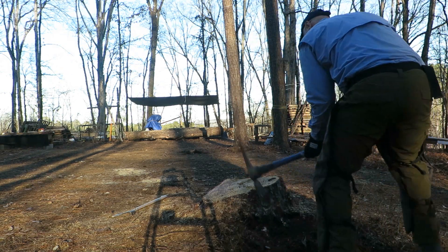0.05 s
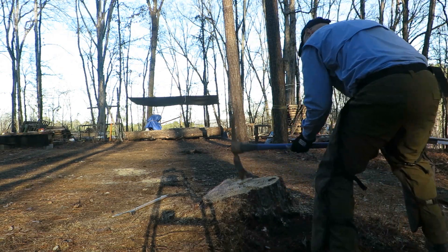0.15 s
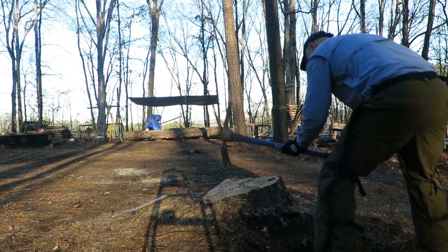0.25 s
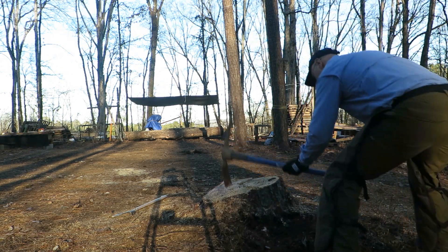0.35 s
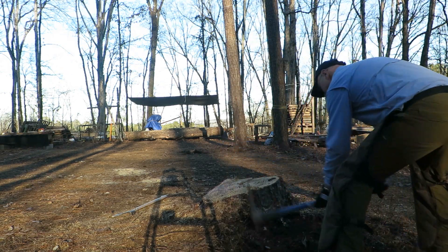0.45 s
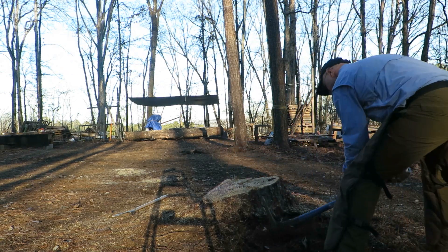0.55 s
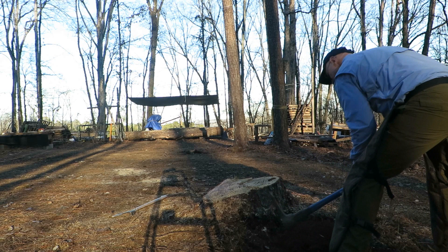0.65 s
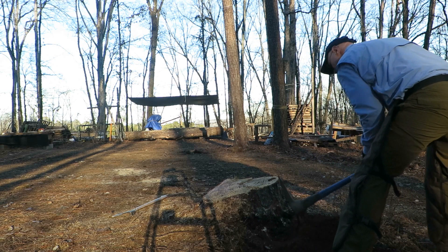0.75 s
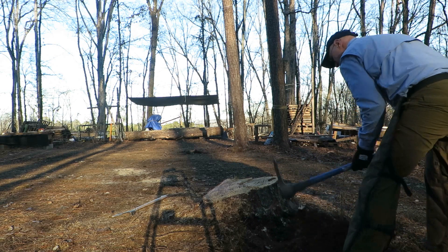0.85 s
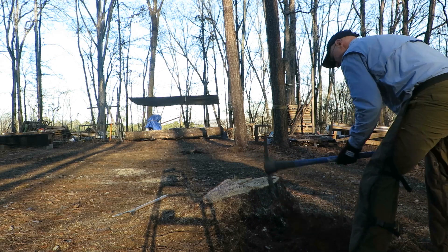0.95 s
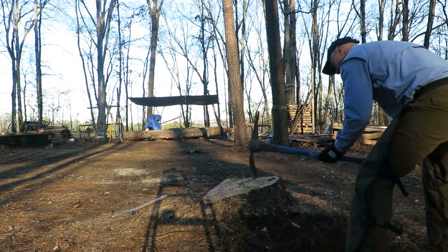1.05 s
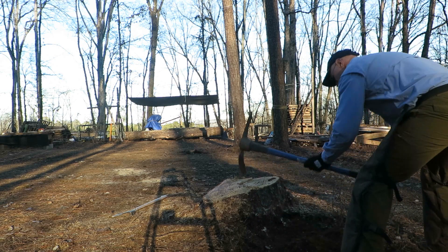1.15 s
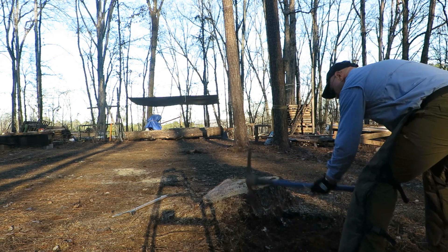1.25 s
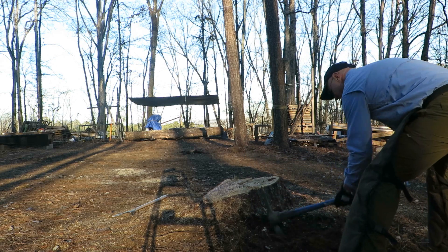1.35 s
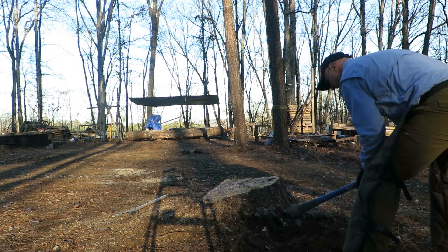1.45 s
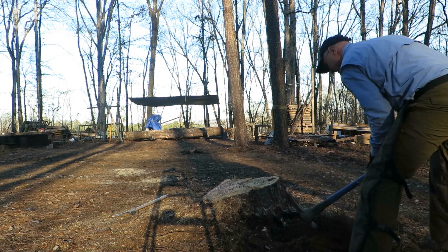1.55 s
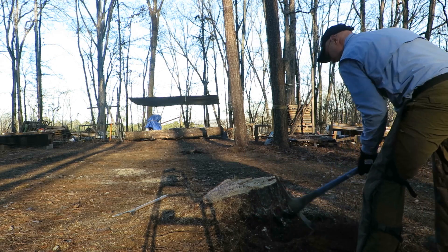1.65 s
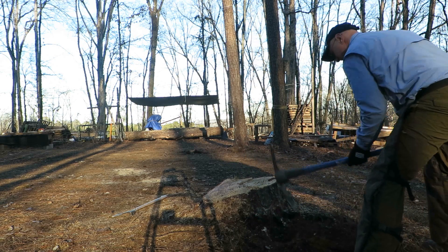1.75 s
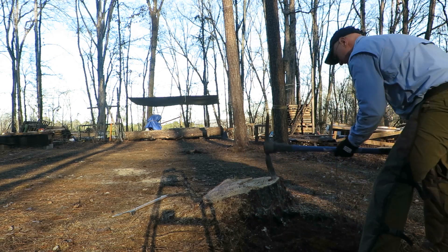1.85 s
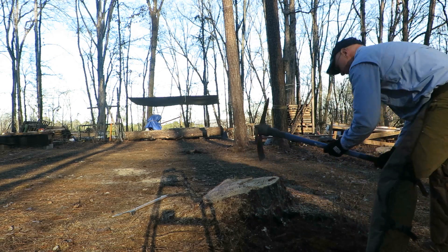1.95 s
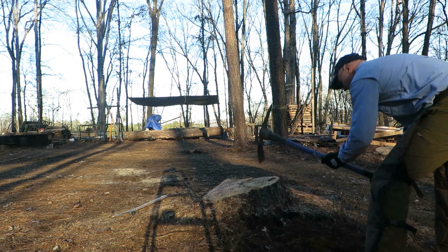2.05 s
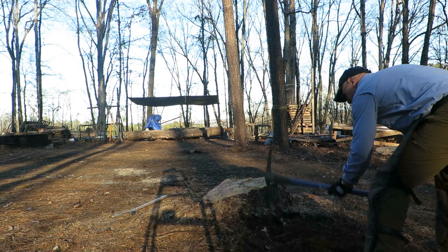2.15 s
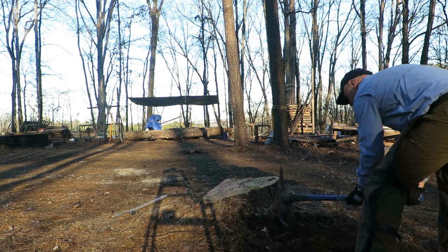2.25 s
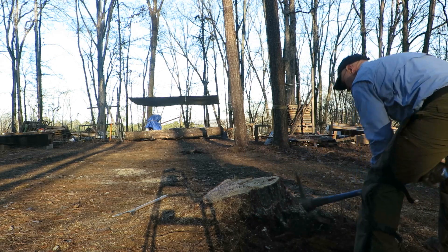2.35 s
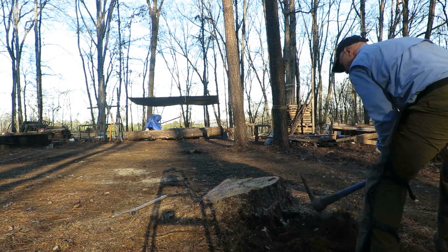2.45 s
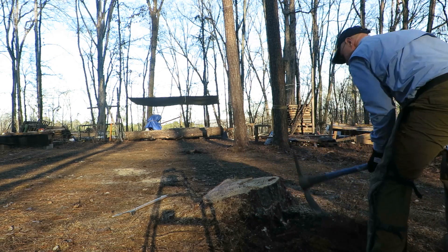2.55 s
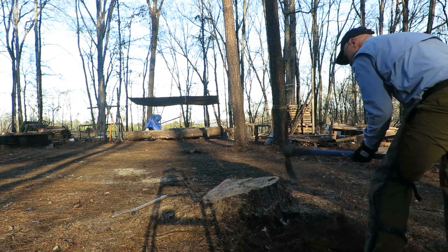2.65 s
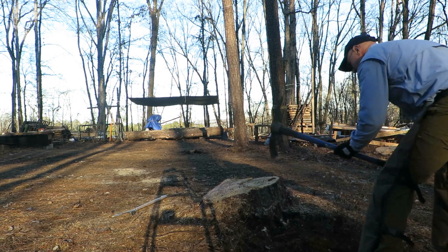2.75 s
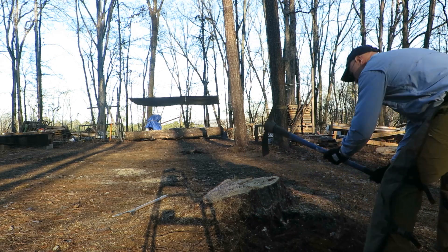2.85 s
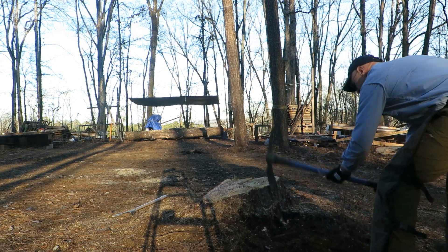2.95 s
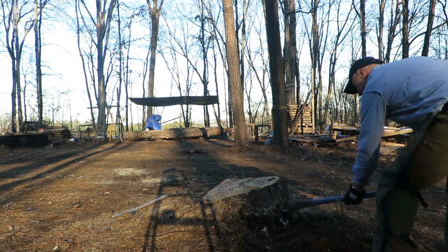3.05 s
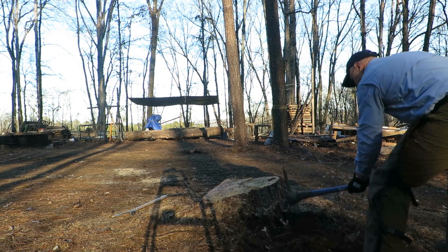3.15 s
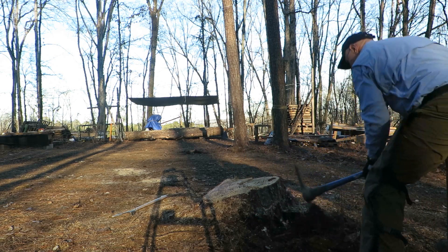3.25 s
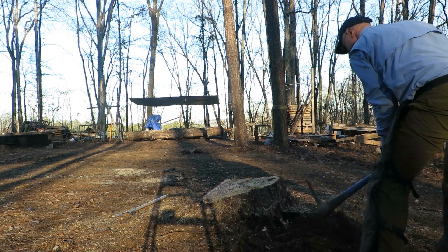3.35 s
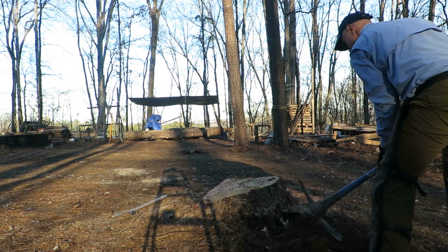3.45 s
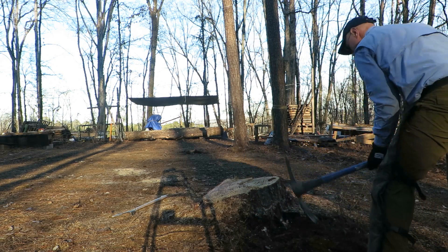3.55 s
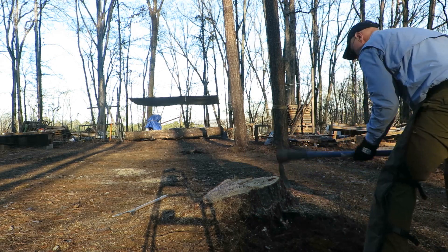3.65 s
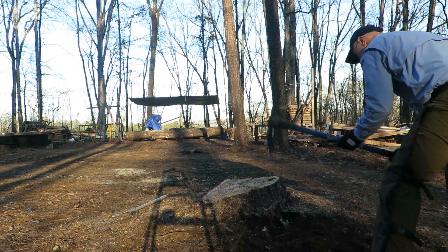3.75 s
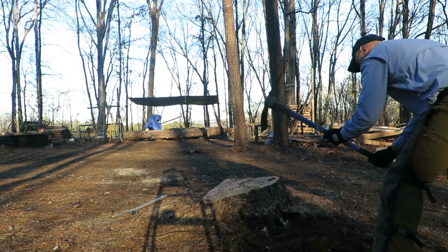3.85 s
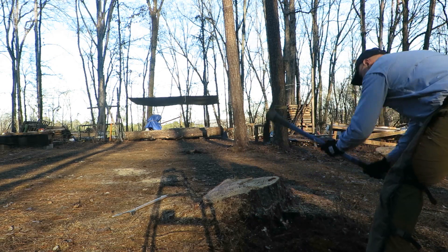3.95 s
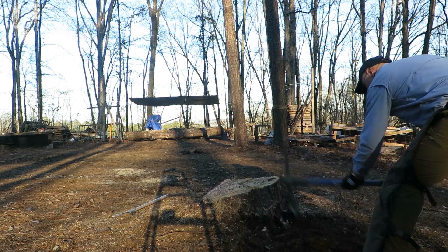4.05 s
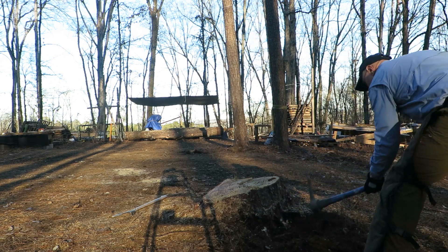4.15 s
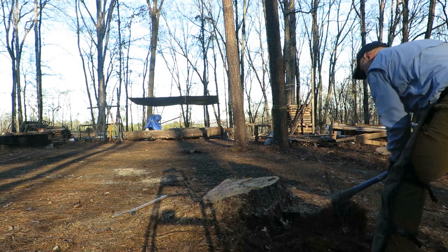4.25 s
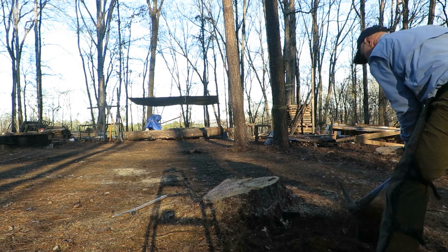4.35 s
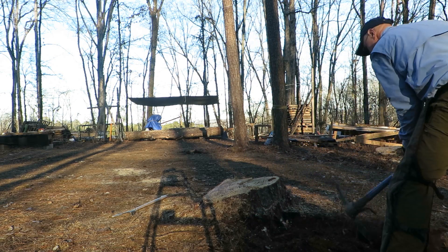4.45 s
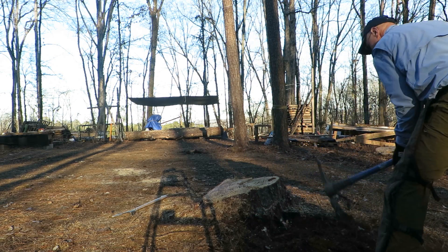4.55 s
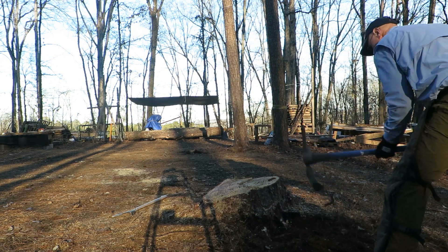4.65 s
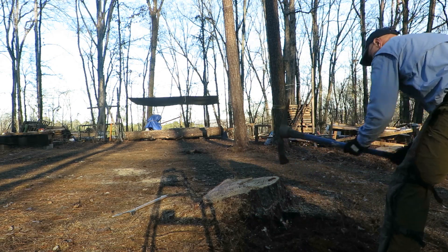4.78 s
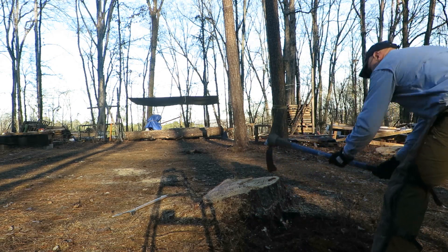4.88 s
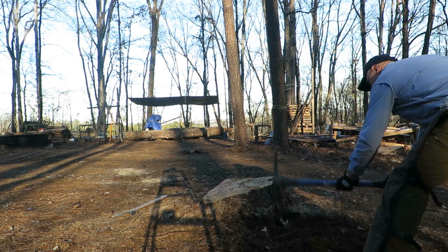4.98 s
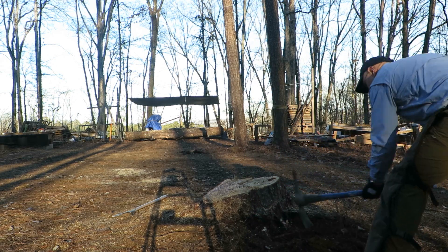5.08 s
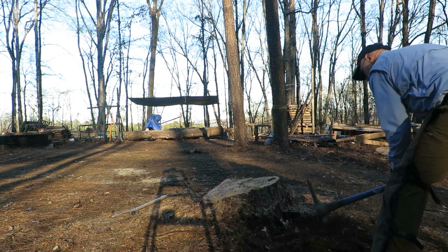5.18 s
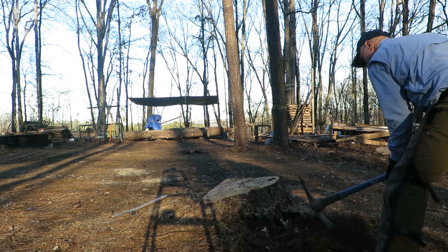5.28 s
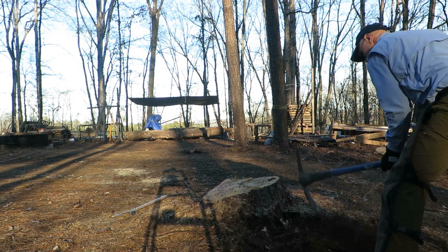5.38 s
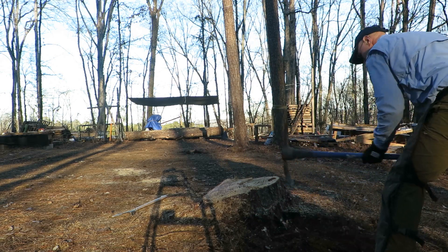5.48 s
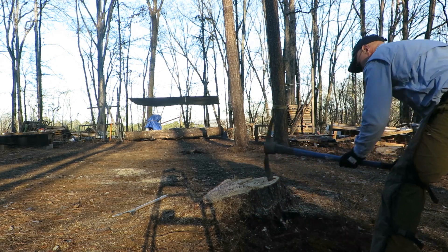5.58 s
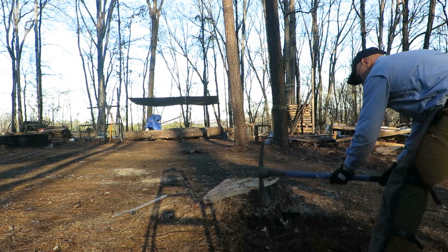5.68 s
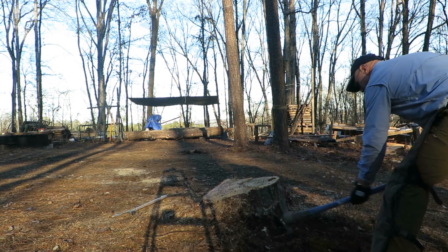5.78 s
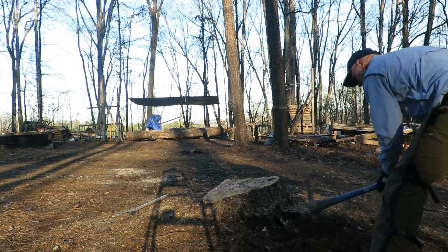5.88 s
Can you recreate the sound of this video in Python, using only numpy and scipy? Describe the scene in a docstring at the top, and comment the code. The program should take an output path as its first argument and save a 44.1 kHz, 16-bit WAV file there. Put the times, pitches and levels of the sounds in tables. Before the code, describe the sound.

Outdoors and close up, a pickax works dry soil and roots, with almost no echo. A brisk rustle of cloth and leaves and a soft wind flutter open the stretch. At 0.65 s the first blow clanks, with a knock, short steel ring and grit. At 1.53 s a duller, coarser chop brings the heaviest low thud. At 2.37 s a crisp gritty crunch thuds, followed by small steel scrapes near 2.5 s. At 3.24 s the head rings brightly; rustling and strong low wind puffs follow until 3.7 s. At 4.28 s comes a short, hard crack. At 5.22 s a knock and thud lead into a rattling run of steel clinks and scraping until about 5.4 s. Crumbs tick throughout and far traffic drones faintly; wind buffets again near 5.65 s. The small stereo microphone's limiter dips the sound after loud blows.

```python
"""Outdoors, a pickax bites into dry soil and roots: grit crunches, the steel head rings briefly, the ground thuds.
Crushing is noise in bursts that rise fast and die exponentially; steel, roots and stones are damped modes.
Clothes and leaf litter rustle as grainy noise, crumbs tick as short noise bursts, far traffic drones as low noise.
Light wind puffs as low noise and swelling tones on a small stereo microphone, whose limiter ducks at the blows."""
import sys
import numpy as np
from scipy import signal
from scipy.fft import rfft, irfft, next_fast_len
from scipy.io import wavfile
from scipy.ndimage import minimum_filter1d, map_coordinates

SR = 44100
rng = np.random.default_rng(int(sys.argv[2]) if len(sys.argv) > 2 else 0)


def int16_out(signal):
    """Quantize to a 16-bit WAV file."""
    q = np.round(np.clip(np.atleast_2d(signal).T, -1, 1) * 32767)
    wavfile.write(sys.argv[1], SR, q.astype(np.int16))


N = 260977

# Modes of the steel head, damped by soil. Each row: frequency in hertz, bandwidth in hertz,
# level in dB under steady shaking.
STEEL_MODES = [(1615, 130, -7), (1875, 150, -6), (2340, 85, 1), (2950, 150, -5), (3980, 60, 2),
               (5400, 120, -4), (5850, 130, -5), (6450, 130, -2), (6960, 80, -1), (8720, 150, -6),
               (9260, 200, -2), (11550, 150, -9)]
# Spectral density of rustling cloth and leaves. Each row: frequency in hertz, relative density in dB per hertz.
CLOTH_SPECTRUM = [(710, -5.5), (1200, -9), (1340, -9.5), (1790, -1), (2180, -4), (3550, -0.5), (3830, 1),
                  (4170, -1), (11900, -2.5), (14500, -12.5), (16000, -29)]
# How the microphone pair hears surrounding sound. Each row: frequency in hertz, likeness of the channels (0-1),
# lead of the left in radians, left minus right in dB.
AROUND_PAIR = [(59, 1, 0.5, -0.46), (200, 0.92, 0, -0.9), (726, 0.51, 0, -1.2), (1380, 0.5, -1, -1.5),
               (2900, 0.78, 1.07, -1), (5830, 0.39, -1.5, -0.67), (8250, 0.23, -1.5, -2),
               (12900, 0.48, -4.5, -1.5)]


def amp(db):
    """Decibels to an amplitude ratio, by the logarithmic law of level."""
    return 10 ** (np.asarray(db) / 20)


def unit(x):
    """Normalization to unit root-mean-square amplitude."""
    return x / np.sqrt(np.mean(x ** 2) + 1e-20)


def along(points, hz):
    """Interpolation of (Hz, value, ..) columns on a logarithmic frequency axis."""
    f, *columns = np.transpose(points)
    return [np.interp(np.log(hz + 1), np.log(f + 1), column) for column in columns]


def curves(rows):
    """Linear interpolation in time: one value per sample for each column after the seconds."""
    s, *columns = np.transpose(rows)
    return [np.interp(np.arange(N) / SR, s, column) for column in columns]


def wobble(rate):
    """Band-limited random modulation: a smooth curve through random knots, rate of them a second."""
    knots = rng.standard_normal(int(N * rate / SR) + 4)
    return map_coordinates(knots, [np.arange(N) * rate / SR])


def filtered(x, response):
    """Linear filtering: the spectrum of x times a complex response of frequency."""
    m = next_fast_len(N + SR // 2)  # zero padding keeps the tail from wrapping round
    return irfft(rfft(x, m) * response(np.fft.rfftfreq(m, 1 / SR)), m)[..., :N]


def noise(spectrum, grain_db, grain_rate):
    """Spectrally shaped noise: two unrelated noises of joint rms 1 that share one grainy flicker."""
    raw = rng.standard_normal((2, N)) * amp(grain_db * wobble(grain_rate))
    return unit(filtered(raw, lambda hz: amp(along(spectrum, hz)[0])))


def ringing(modes):
    """Modal superposition: the response of a set of resonances with alternating sign."""
    def response(f):
        total = 0
        for k, (center, width, db) in enumerate(modes):
            resonance = 1j * f * width / (center * center - f * f + 1j * f * width)
            total = total + (-1) ** k * amp(db) * resonance
        return total
    return response


def heard(pair, ports):
    """Interchannel coherence: mixes a sound and its unrelated twin into left and right; the mean keeps its level."""
    def response(hz):
        alike, lead, lean_db = along(ports, hz)
        turn = np.arccos(np.clip(alike, 0, 1)) / 2
        left = amp(lean_db / 2) * np.exp(.5j * lead)
        shared, unrelated = np.cos(turn), np.sin(turn)
        mean = np.hypot(abs(left + 1 / left) * shared, abs(left - 1 / left) * unrelated) / 2
        return np.array([[left * shared, left * unrelated], [shared / left, -unrelated / left]]) / mean
    return filtered(pair, response).sum(axis=1)


def add(track, s, sound):
    """Superposition: mixes a short sound in at s seconds."""
    part = track[..., round(s * SR):][..., :sound.shape[-1]]
    part += sound[..., :part.shape[-1]]


def traffic():
    """Broadband drone: far traffic as low noise of slowly fluctuating level."""
    # Each row: time in seconds, level in dB about which the drone fluctuates.
    traffic_levels = [(0, -39.5), (1, -39.5), (2, -41.5), (2.7, -46), (3.4, -40), (4.4, -44), (5.92, -40)]
    # Each row: frequency in hertz, relative density in dB per hertz.
    drone_spectrum = [(30, -0.5), (100, 8), (200, -3.5), (350, -4.5), (540, -1.5), (1130, -7),
                      (2500, -27.5), (3250, -23), (5500, -120)]
    level_db = curves(traffic_levels)[0] + 2.6 * wobble(5.27)
    return amp(level_db) * noise(drone_spectrum, 0.2, 34)


def wind():
    """Turbulent pressure: low noise flutters on the microphone, and strong eddies add swelling tones."""
    # Each row: time in seconds, level in dB of the steady flutter.
    wind_levels = [(0.0, -51), (0.05, -36), (0.18, -68), (0.33, -72), (0.77, -42), (0.92, -45), (1.14, -50),
                   (1.43, -43.5), (2.34, -43), (2.67, -47.5), (3.43, -41.5), (3.84, -40.5), (4.48, -44),
                   (4.65, -38), (4.78, -39), (4.91, -40.5), (5.5, -44), (5.92, -39.5)]
    # Each row: frequency in hertz, relative density in dB per hertz.
    buffet_spectrum = [(13, -22), (22, -10), (43, 10.5), (107, -2), (135, 0), (157, -3.5), (300, -23),
                       (390, -13), (660, -120)]
    # Strongest eddies. Each row: time in seconds (the swell starts 4 ms before it), level in dB, pitch in hertz.
    puffs = [(0.099, -22, 105), (0.172, -27, 90), (0.19, -21, 109), (0.44, -33, 119.5), (0.615, -32, 69.4),
             (1.836, -29, 95), (2.2, -24.5, 74), (2.239, -24.5, 91.5), (2.27, -19.5, 88),
             (2.289, -18.5, 101), (3.214, -20.5, 100), (3.279, -25.5, 86), (3.34, -22.5, 76),
             (3.522, -18.5, 59), (3.561, -23, 60), (3.625, -22, 79.5), (3.679, -18, 145), (3.707, -22, 68),
             (4.451, -22.5, 100.5), (4.554, -29, 112), (4.565, -23, 107), (4.609, -25.5, 90),
             (4.719, -20, 124), (4.738, -20, 102), (4.835, -25.5, 113), (4.848, -32, 110),
             (5.631, -22, 143), (5.652, -18, 89), (5.669, -15.5, 135), (5.689, -17.5, 90)]
    out = amp(curves(wind_levels)[0]) * noise(buffet_spectrum, 1.9, 8.5)
    t = np.arange(SR // 12) / SR
    for (s, db, hz), phase in zip(puffs, rng.uniform(0, 2 * np.pi, len(puffs))):
        swell = t * hz / 0.55 * np.exp(1 - t * hz / 0.52)  # fullest after about half a cycle
        cycle = 2 * np.pi * hz * t + phase
        swing = np.sin(cycle) + 0.33 * np.sin(2 * cycle)  # the overtone makes it lopsided
        add(out[0], s - .004, amp(db) * swell * swing)
    return out


def crackle():
    """Poisson process: dry bits of leaf and soil snap at random, each a noise burst of about a millisecond."""
    rate, spread_db, decay_s = 330, 3.5, 0.0013  # snaps per second, size scatter in dB, e-fold time
    sizes = amp(spread_db * np.minimum(rng.exponential(size=N), 3.5))
    snaps = (rng.uniform(size=N) < rate / SR) * sizes
    bursts = signal.lfilter([1], [1, -np.exp(-1 / (decay_s * SR))], snaps)
    return unit(filtered(bursts * rng.standard_normal((2, N)), lambda hz: amp(along(CLOTH_SPECTRUM, hz)[0])))


def rustle():
    """Friction noise: clothes and leaves make dense fine grains, crisper as the movement grows brisker."""
    # Each row: time in seconds, level in dB about which the rustle flickers.
    rustle_levels = [(0, -23.5), (.115, -42.5), (.42, -46), (.494, -34), (.62, -42.5), (.758, -46),
                     (.863, -37), (.93, -39.5), (.993, -34.5), (1.122, -39.5), (1.207, -31.5), (1.36, -45),
                     (1.46, -42.5), (1.69, -40), (1.76, -43.5), (1.94, -41), (2.105, -43), (2.22, -33.5),
                     (2.27, -40.5), (2.32, -33.5), (2.37, -39), (2.579, -43.5), (2.794, -39.5),
                     (2.998, -42), (3.22, -35.5), (3.317, -43), (3.467, -44.5), (3.527, -31), (3.6, -37.5),
                     (3.707, -29.5), (3.826, -45.5), (4.2, -48), (4.36, -46.5), (4.42, -42), (4.505, -47),
                     (4.724, -32), (5.03, -45.5), (5.178, -42), (5.37, -32), (5.5, -38), (5.642, -39),
                     (5.917, -48)]
    crisp_full_db, crisp_range_db = -20, 33  # all crisp at this level, all dull this far below
    crackle_db = -9.5  # re the rustle
    db, = curves(rustle_levels)
    # the spectrum tilts 4 dB per octave about 5 kHz either way
    dull = noise([(hz, v - 4 * np.log2(hz / 5000)) for hz, v in CLOTH_SPECTRUM], 1.4, 900)
    crisp = noise([(hz, v + 4 * np.log2(hz / 5000)) for hz, v in CLOTH_SPECTRUM], 1.0, 1500)
    share = np.clip(1 + (db - crisp_full_db) / crisp_range_db, 0, 1)
    grains = np.sqrt(1 - share) * dull + np.sqrt(share) * crisp
    flicker_db = 1.3 * wobble(30) + 1 * wobble(90)
    return amp(db + flicker_db) * (grains + amp(crackle_db) * crackle())


def scattered(count, db, hz):
    """Random scatter: rows (s, dB, pitch Hz) of small ticks, within 4 dB and 1.3 octaves of the given centre."""
    when, size, pitch = rng.uniform(size=(count, 3)).T
    return list(zip(when * N / SR, db + 8 * (size - .5), hz * 2 ** (2.6 * (pitch - .5))))


def crumbs():
    """Impact noise: each crumb or twig is a short decaying burst of noise in a band around its pitch."""
    # Loudest crumbs and twigs. Each row: start in seconds, level in dB, pitch in hertz.
    ticks = [(.0674, -29.5, 3870), (.562, -29, 5770), (.776, -29.5, 10600), (1.2034, -25, 9670),
             (1.6357, -34.5, 2330), (1.661, -30, 1890), (2.0306, -33, 5200), (2.13, -30, 4450),
             (2.8262, -36, 1760), (3.0528, -28.5, 3840), (3.173, -30, 10000), (3.2024, -32, 6890),
             (3.512, -30, 9360), (4.49, -39, 1790), (4.58, -40, 3500), (4.651, -33, 6720),
             (4.789, -27.5, 1680), (5.0814, -30.5, 9600), (5.092, -30, 11500), (5.1203, -27, 4030),
             (5.163, -37, 10100), (5.4263, -27.5, 8300), (5.4571, -28, 1930), (5.5378, -28, 1670),
             (5.6045, -27.5, 7750), (5.8, -30, 3470)]
    t60 = 0.026  # s
    out, t = np.zeros((2, N)), np.arange(SR // 20) / SR
    for s, db, hz in list(ticks) + scattered(count=14, db=-47, hz=4800):
        band = signal.butter(2, [hz / 1.53, min(hz * 1.3, SR / 2.2)], "bandpass", fs=SR)
        burst = unit(signal.lfilter(*band, rng.standard_normal((2, len(t)))))
        add(out, s, amp(db - 60 * t / t60) * burst)
    return out


def ground():
    """Damped yielding: the ground gives in flattened low swings that die fast, roughened by breaking clods."""
    # Each row: time in seconds (the thud starts half a cycle before it), level in dB, pitch in hertz.
    thuds = [(0.659, -16.5, 251), (0.666, -25, 546), (1.518, -19.5, 76.6), (1.532, -19, 330),
             (1.5361, -3.5, 140), (1.552, -24, 79.5), (2.411, -14, 144), (2.52, -33, 313),
             (2.533, -36, 304), (3.238, -18.5, 150), (3.246, -24, 332), (3.479, -33, 393),
             (3.496, -33, 398), (4.281, -27, 343), (4.284, -22.5, 138), (5.2279, -10.5, 144),
             (5.3344, -18, 420)]
    # Each row: frequency in hertz, relative density in dB per hertz.
    clod_spectrum = [(120, -45), (250, 15.5), (400, 12), (800, 14), (1400, -14)]
    full_build_s, longer_per_db = 0.018, 0.5  # 60 dB build at 0 dB; weak thuds last longer, dB of time per dB
    dies_faster = 1.96  # than it builds
    clods_db = -9  # re the thud's envelope
    out, clods = np.zeros((2, N)), np.zeros(N)
    for s, db, hz in thuds:
        t = np.arange(SR // 5) / SR - .5 / hz
        late = t - 0.575 / hz  # time after the envelope's peak
        build_s = full_build_s * amp(-longer_per_db * db)
        shape = amp(db - 60 * np.maximum(-late, dies_faster * late) / build_s)
        blunt = np.tanh(2 * np.sin(2 * np.pi * hz * t))
        add(out[0], s - .5 / hz, shape * blunt)
        add(clods, s - .5 / hz - .003, amp(clods_db) * shape)  # clods break 3 ms ahead
    return out + clods * noise(clod_spectrum, 2.2, 330)


def clinks():
    """Modal excitation: a stone striking the steel rings the head's modes, those near its favoured mode the most."""
    # Each row: start in seconds, level in dB of the favoured mode, favoured mode in hertz.
    stone_strikes = [(0.659, -11, 1615), (0.6593, -7.5, 2950), (0.661, -11.5, 3980), (1.53, -17, 5400),
                     (1.530, -16, 3980), (1.661, -35, 1875), (2.464, -29, 3980), (2.5188, -15, 1875),
                     (2.525, -19, 2340), (2.5312, -17, 3980), (2.533, -19, 2340), (2.694, -32, 3980),
                     (3.229, -17, 6960), (3.234, -13, 6960), (3.2347, -10, 3980), (3.2411, -8, 2950),
                     (3.2462, -6.5, 9260), (4.277, -9, 6960), (5.223, -21, 6960), (5.2797, -6.5, 9260),
                     (5.283, -10, 9260), (5.281, -18, 2340), (5.2798, -16.5, 3980), (5.281, -16, 6960),
                     (5.299, -18, 2340), (5.308, -9, 3980), (5.3065, -16, 2340), (5.309, -23, 5400),
                     (5.316, -12, 3980), (5.329, -15, 2340), (5.334, -11, 6450), (5.341, -11, 6960),
                     (5.344, -25, 2340), (5.3645, -26, 6450), (5.457, -31, 1875), (5.538, -32, 1615)]
    fall_db = 40  # other modes weaken this much per octave from the favoured one
    out, t = np.zeros((2, N)), np.arange(SR // 10) / SR
    all_phases = rng.uniform(0, 2 * np.pi, (len(stone_strikes), len(STEEL_MODES)))
    for (s, db, favoured), phases in zip(stone_strikes, all_phases):
        ring = np.zeros(len(t))
        for (hz, width, _), phase in zip(STEEL_MODES, phases):
            level = amp(db - fall_db * abs(np.log2(hz / favoured)))
            decay = np.exp(-np.pi * 1.2 * width * t)  # a fifth faster than the bandwidth implies
            ring += level * decay * np.sin(2 * np.pi * hz * t + phase)
        add(out[0], s, (1 - np.exp(-t / 0.00051)) * ring)
    return out


def knocks():
    """Bar vibration: a root or stone met by the head sets off one short damped tone and its inharmonic overtone."""
    # Each row: start in seconds, level in dB, pitch in hertz, t60 in seconds.
    hard_spots = [(.649, -16, 810, 0.0076), (0.6554, -11.5, 1230, 0.022), (0.6573, -6.5, 1560, 0.035),
                  (.664, -11, 1620, .025), (1.5298, -8.5, 1850, 0.026), (1.531, -13, 1250, 0.021),
                  (2.371, -10.5, 1750, 0.019), (2.378, -9, 1890, 0.023), (2.4058, -16, 2380, .03),
                  (2.519, -25, 1680, .015), (2.531, -23, 1645, 0.05), (3.2375, -13, 825, 0.018),
                  (3.247, -12, 2400, 0.027), (3.263, -24, 1600, .015), (3.381, -22, 2460, 0.03),
                  (3.4, -27, 2410, .032), (4.2762, -6.5, 2470, 0.016), (4.2756, -5, 900, 0.011),
                  (4.2831, -10, 1890, .018), (5.2232, -4.5, 1890, 0.022), (5.2271, -13, 600, .015),
                  (5.2214, -11, 1534, 0.02), (5.3056, -8, 2380, 0.041), (5.306, -21, 1310, .03)]
    overtone, overtone_db = 2.6, -14  # the second mode as a multiple of the first, and its level
    out, t = np.zeros((2, N)), np.arange(SR // 10) / SR
    for s, db, hz, t60 in hard_spots:
        tone = np.sin(2 * np.pi * hz * t) + amp(overtone_db) * np.sin(2 * np.pi * overtone * hz * t)
        onset = 1 - np.exp(-t / 0.00042)
        add(out[0], s, amp(db - 60 * t / t60) * onset * tone)
    return out


def pick():
    """Granular fracture and forced vibration: contacts crush grit in three sizes and shake the steel head."""
    # Contacts of the head with the soil. Each row: peak in seconds, grit level in dB, t60 in seconds,
    # coarse chop in dB re grit, shaking of the steel in dB re grit.
    bites = [(0.649, -30, 0.057, -2, 13), (0.657, -19.5, 0.031, -1.5, 18), (0.664, -22, 0.066, 4.5, 12),
             (0.691, -33.5, 0.14, -2, 9), (1.474, -40, 0.11, -29, 0), (1.523, -29, 0.15, -3.5, -6),
             (1.5311, -22.5, 0.02, 10.5, -4), (1.558, -45, 0.081, 15, 0), (2.371, -21, 0.064, -9, 19),
             (2.3755, -11, 0.022, -8.5, 2), (2.3827, -14.5, 0.021, -8, 5), (2.392, -27, 0.095, -4, 18),
             (2.4068, -15.5, 0.032, -4.5, 3), (2.427, -25, 0.1, -13, 2), (2.465, -36, 0.11, -7, 4),
             (2.519, -28.5, 0.036, 0.5, 23), (2.53, -30, 0.097, -4, 17.5), (3.23, -28, 0.075, -10, 21.5),
             (3.2374, -13.5, 0.047, -8, 3), (3.2467, -18.5, 0.025, -2, 11), (3.259, -31.5, 0.13, 6.5, 6),
             (3.353, -45, 0.34, 11.5, 16), (3.384, -40, 0.12, -16, 12), (4.2768, -14, 0.019, 1, 7),
             (4.284, -14.5, 0.019, -4, 5), (4.294, -30, 0.07, 1.5, 11), (5.2214, -15.5, 0.013, -20, -5),
             (5.222, -18, 0.036, 1.5, 5), (5.243, -27, 0.073, -8, -3), (5.2775, -35, 0.03, -20, 10),
             (5.281, -28, 0.029, -12, 22), (5.299, -26, 0.039, -2, 16), (5.306, -23, 0.033, -5, 21),
             (5.317, -29, .035, -14, 13), (5.327, -23.5, 0.097, 1, 20), (5.338, -25, 0.029, 4, 16),
             (5.346, -30, 0.051, -6, 16)]
    # In these three spectra, each row: frequency in hertz, relative density in dB per hertz.
    chop_spectrum = [(350, -12), (500, -7.5), (900, -5), (1300, -6.5), (1800, -6), (2500, -9.5),
                     (3500, -13.5), (5000, -31)]
    grit_spectrum = [(1800, -10), (2800, 7), (4000, 9), (5200, 4), (6500, 8.5), (8000, 1), (10000, -55)]
    spray_spectrum = [(5500, -40), (7500, -4.5), (10000, 3), (13000, -3), (15500, -15), (17000, -38)]
    rise_share = 0.044  # e-fold time of the rise as a share of t60
    spray_base_db, spray_per_chop = -4, -0.38  # fine spray re grit; the coarser the soil, the less of it
    split_hz, high_modes_db = 4700, -4.5  # upper steel modes re the lower
    lead = .04  # s of rise before the peak
    chop, grit, spray, shake = np.zeros((4, N))
    t = np.arange(SR // 5) / SR - lead
    for s, db, t60, chop_db, steel_db in bites:
        shape = amp(db) * np.where(t < 0, np.exp(t / (rise_share * t60)), amp(-60 * t / t60))
        spray_db = spray_base_db + spray_per_chop * chop_db
        for track, rel_db in ((chop, chop_db), (grit, 0), (spray, spray_db), (shake, steel_db)):
            add(track, s - lead, amp(rel_db) * shape)
    crunch = chop * noise(chop_spectrum, 2, 900)
    crunch += grit * noise(grit_spectrum, 3, 1200)
    crunch += spray * noise(spray_spectrum, 3, 3000)
    stones = rng.standard_normal((2, 2, N)) * amp(4 * wobble(700))  # stones knock the steel unevenly
    low = filtered(shake * unit(stones[0]), ringing([m for m in STEEL_MODES if m[0] < split_hz]))
    high = filtered(shake * unit(stones[1]), ringing([m for m in STEEL_MODES if m[0] > split_hz]))
    return crunch + low + amp(high_modes_db) * high


def scene():
    """Superposition: the surroundings, the wind at the microphone and the near digging, each heard in its own way."""
    # How the pair hears wind, then the near digging. Each row: frequency in hertz, likeness of the channels (0-1),
    # lead of the left in radians, left minus right in dB.
    wind_pair = [(35, .98, 0, -3), (70, .95, 1.3, -5), (120, .95, 2.1, -1.5), (180, .95, 2.5, 1.5),
                 (260, .9, 2.7, 3)]
    near_pair = [(100, 0.92, -0.11, 0), (800, 0.98, -0.33, -2.5), (3080, 1, -0.47, -0.5),
                 (7100, 0.46, -0.33, -2.5), (12000, 0.54, -0.64, -1.5)]
    background = heard(traffic(), AROUND_PAIR) + heard(wind(), wind_pair)
    movement = heard(rustle(), AROUND_PAIR)
    digging = heard(crumbs() + ground() + clinks() + knocks() + pick(), near_pair)
    return background + movement + digging


def record(dry):
    """Dynamic range compression: a limiter ducks and recovers smoothly; then soft clipping and band limits."""
    level_db = 20 * np.log10(np.abs(dry).max(axis=0) + 1e-9)
    need_db = -.8 * np.clip(level_db + 16, 0, 30)  # acts above -16 dB
    held_db = minimum_filter1d(need_db, size=SR // 100, origin=SR // 200 - 1)  # holds for 10 ms
    keep = np.exp(-1 / (0.077 * SR))  # 77 ms smoothing, down and up
    wet = dry * amp(signal.lfilter([1 - keep], [1, -keep], held_db))
    wet = wet / (1 + np.abs(wet / .95) ** 6) ** (1 / 6)  # soft clipping toward 0.95
    bass_cut = signal.butter(2, 33, "highpass", fs=SR, output="sos")
    top_hz = 16000
    return filtered(signal.sosfilt(bass_cut, wet), lambda hz: 1 / (1 + (hz / top_hz) ** 100))


dry = scene()
out = record(dry)
int16_out(out)
```